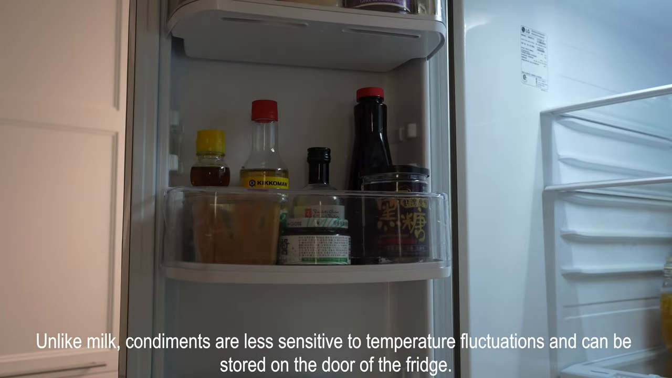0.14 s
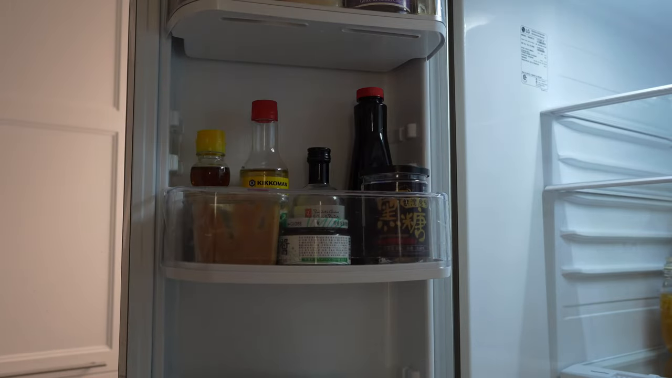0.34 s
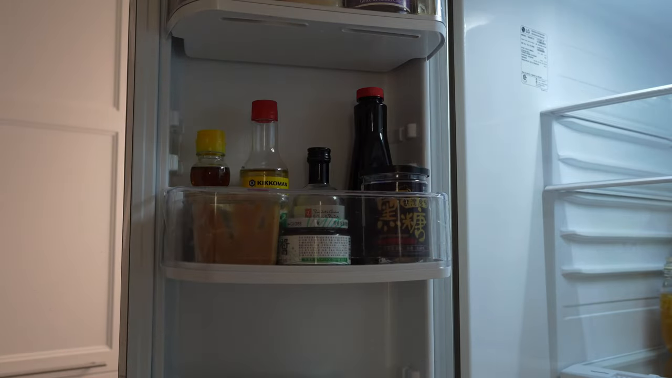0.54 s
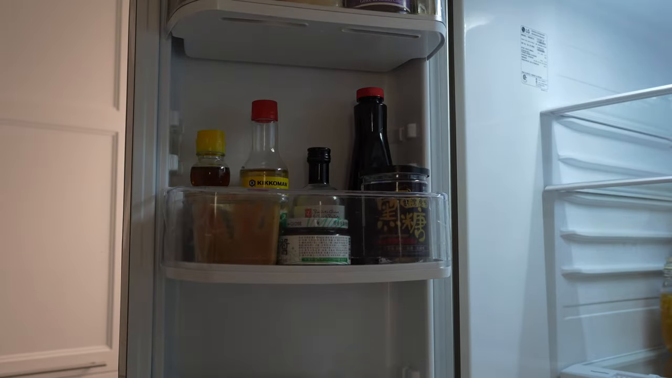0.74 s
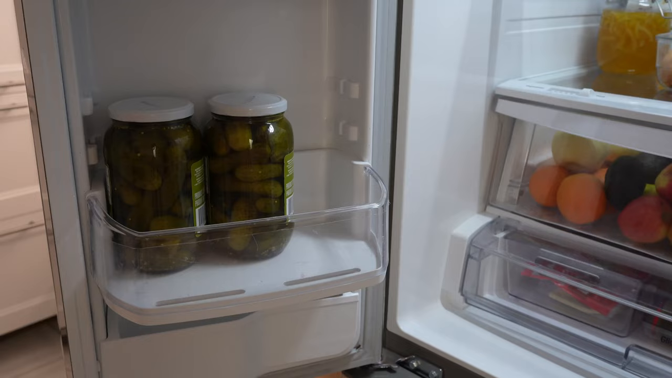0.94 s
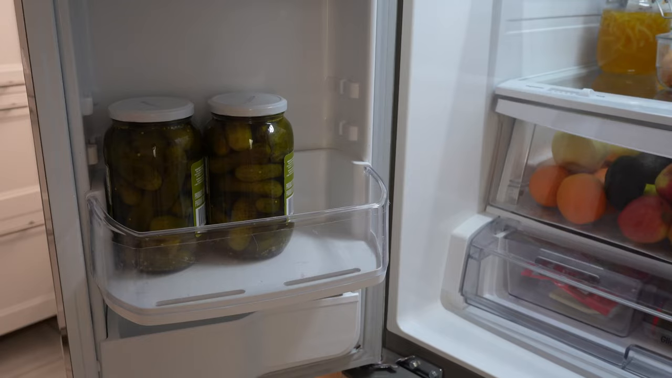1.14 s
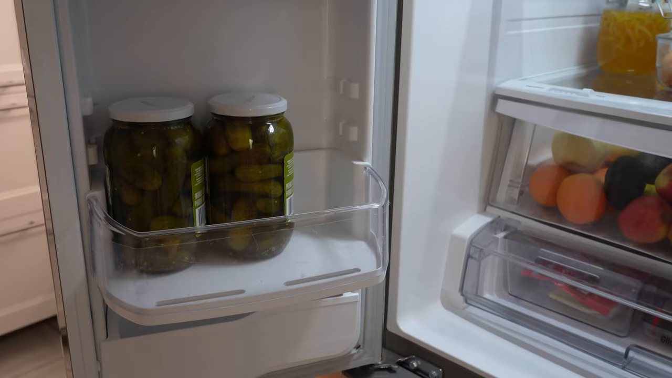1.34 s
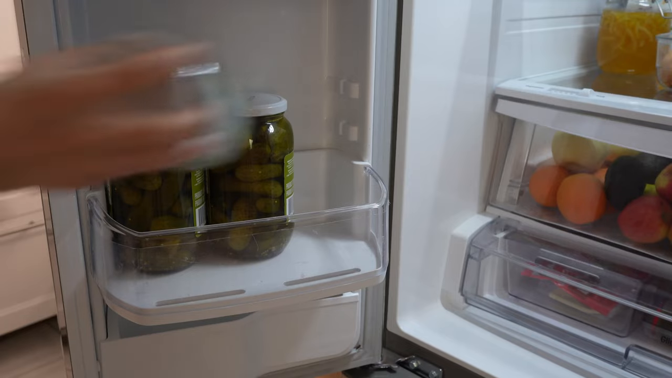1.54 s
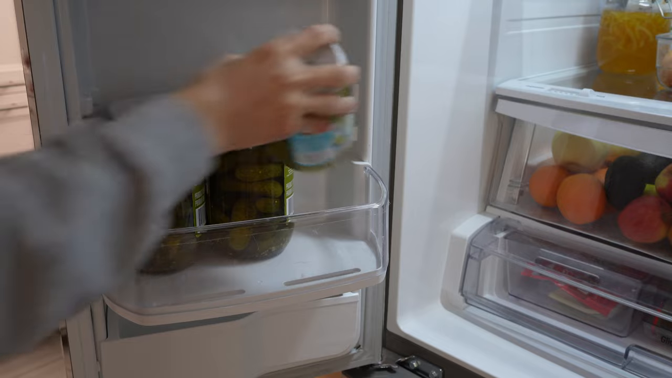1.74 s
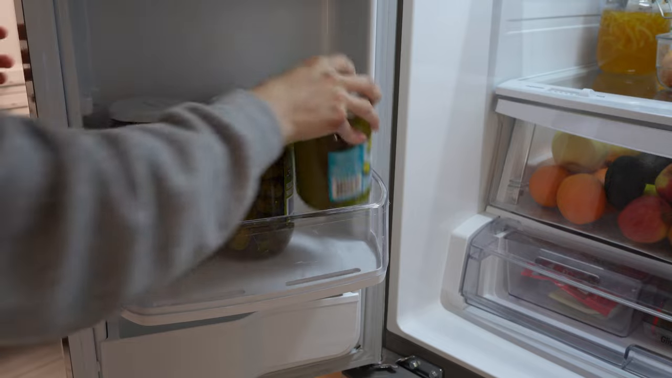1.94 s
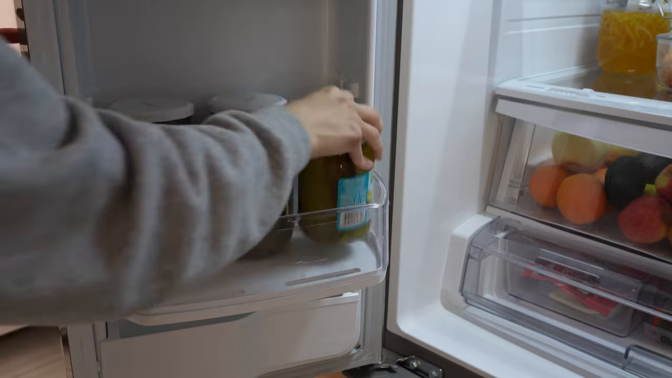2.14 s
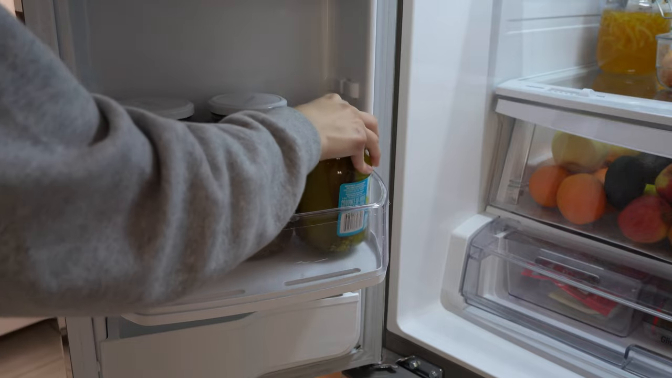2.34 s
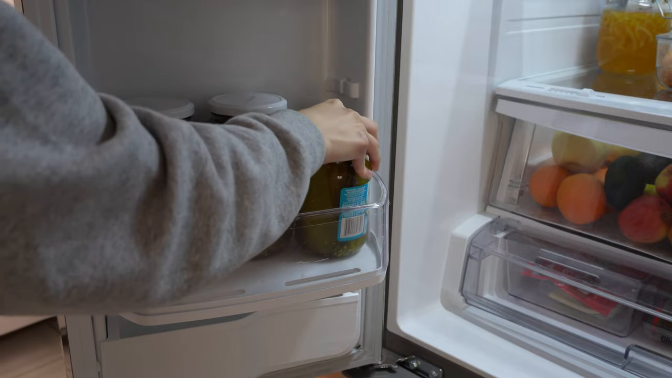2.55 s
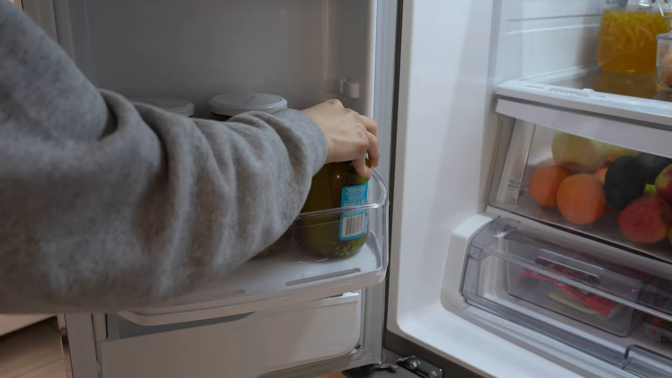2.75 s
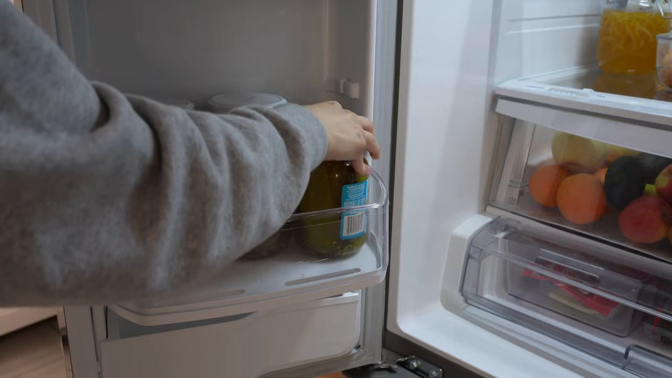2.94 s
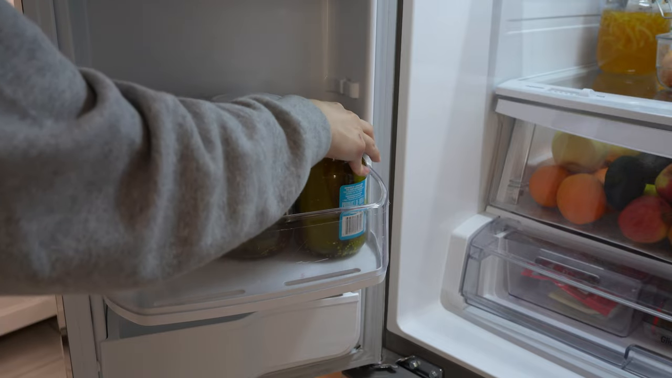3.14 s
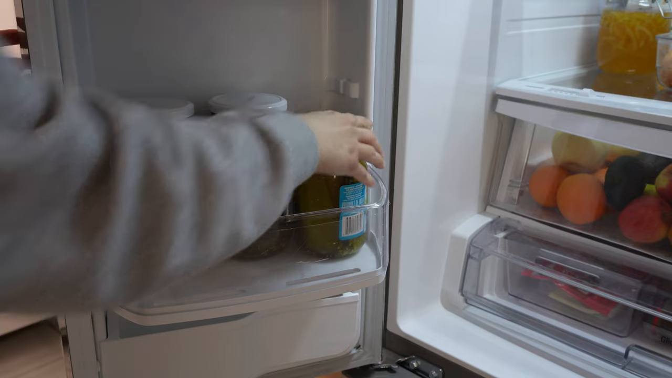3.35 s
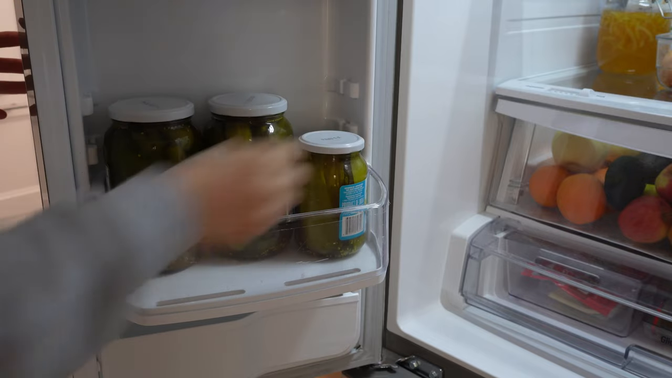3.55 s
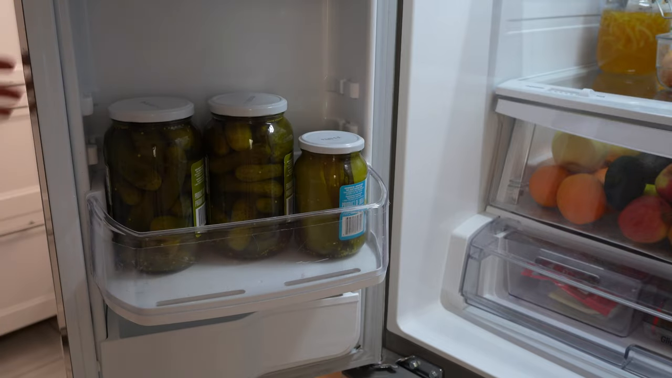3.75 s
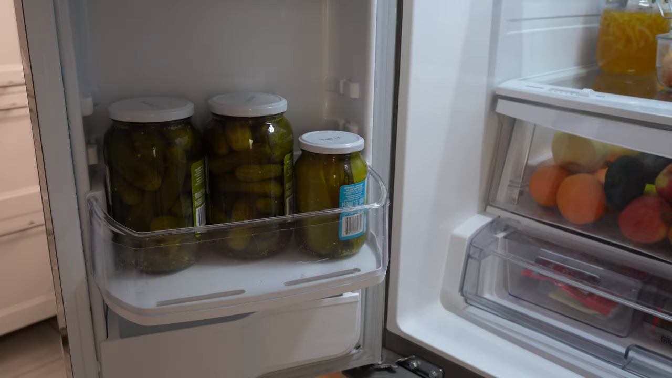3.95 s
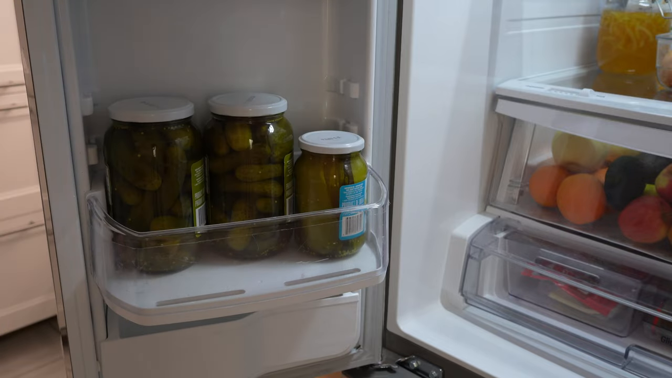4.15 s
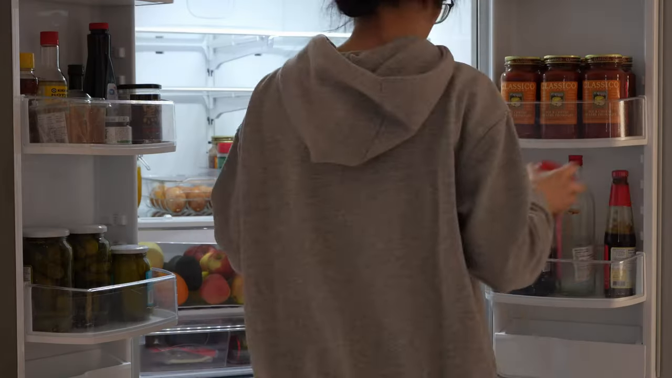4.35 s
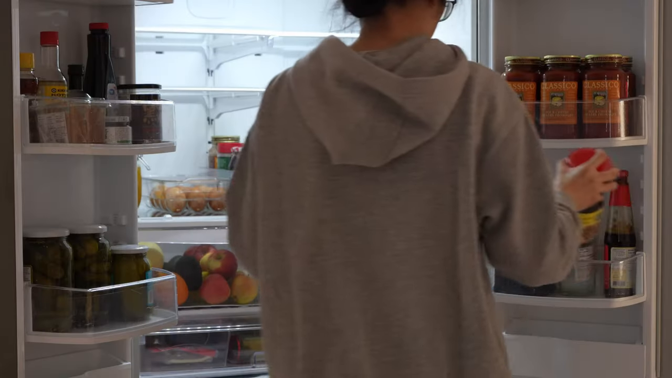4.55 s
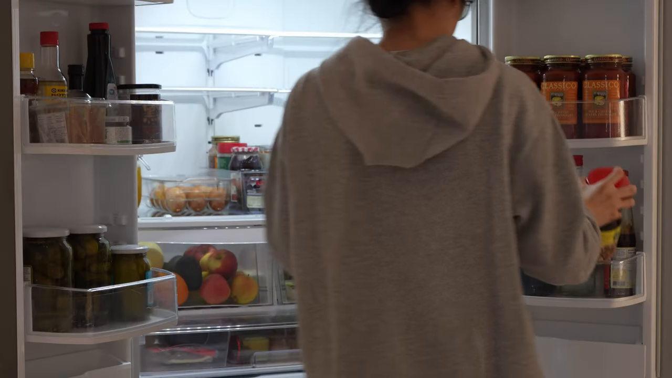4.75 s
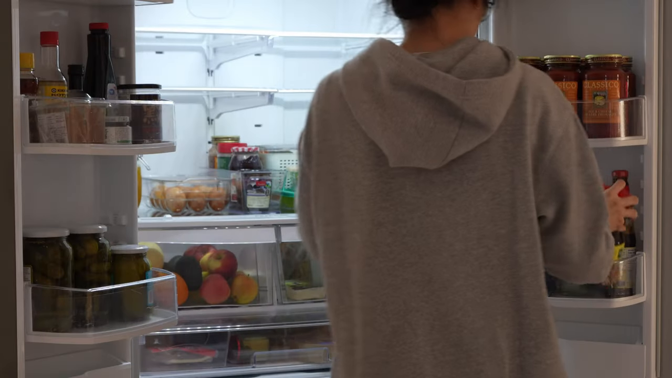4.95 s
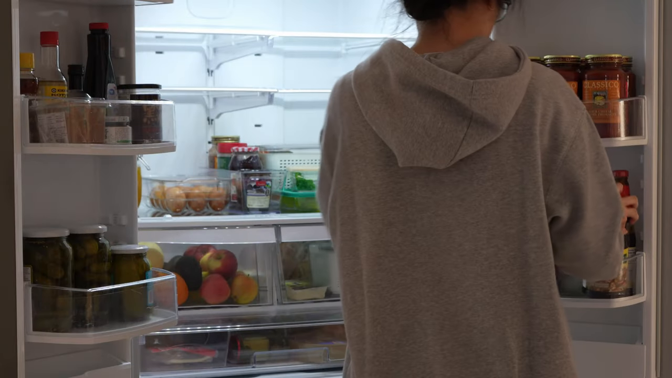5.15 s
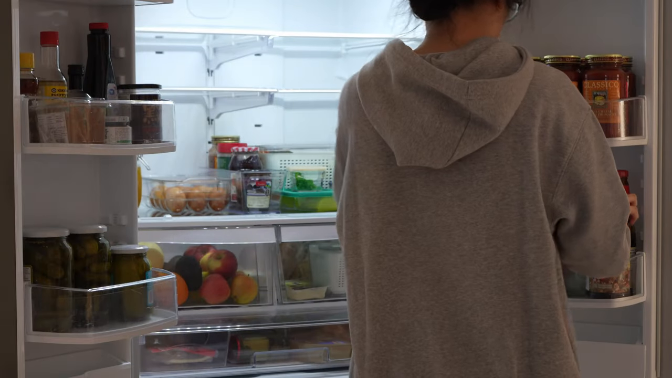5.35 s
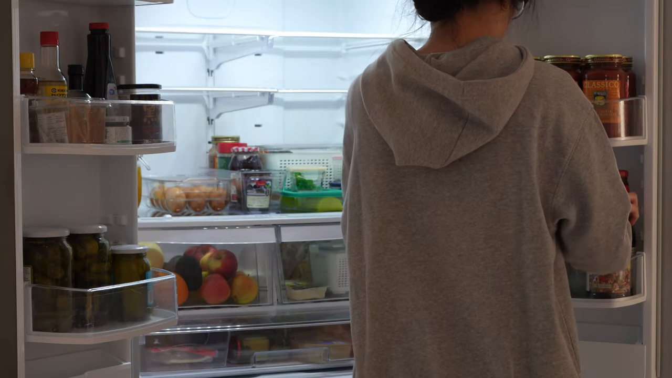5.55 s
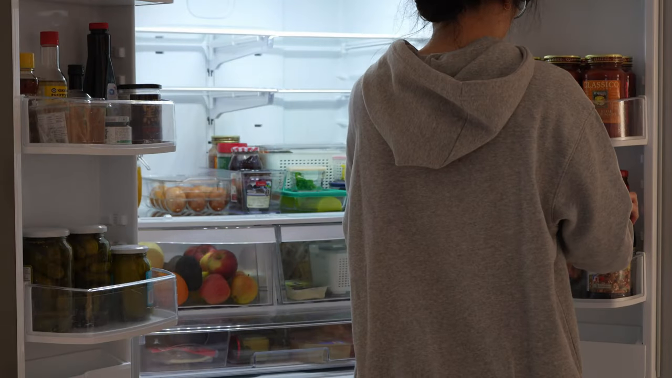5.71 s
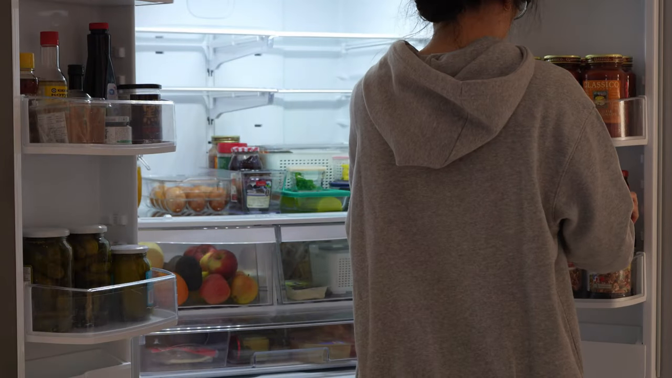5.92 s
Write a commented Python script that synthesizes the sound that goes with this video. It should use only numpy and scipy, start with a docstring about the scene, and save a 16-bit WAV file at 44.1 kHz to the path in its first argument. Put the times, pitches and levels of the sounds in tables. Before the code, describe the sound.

Quiet kitchen, open refrigerator humming, small birds whistling faintly to the right. A jar lands with a cluster of hollow plastic knocks and a brief glass clink, is nudged twice more, then released. After a pause, a bottle settles in the opposite door with roomier knocks and longer clinks.

```python
"""Jar and bottle in the fridge door

A glass jar is nudged into a plastic door bin, then a bottle goes into the other door, farther away.
Each knock is a set of dying tones, plastic clatter, a glass clink and a low boom, with a kitchen echo.
Shaped noise makes the fridge's low hum and air, the light taps and the rustling sleeve.
Gliding, slightly unsteady tones make the faint birds outside.
"""
import sys
import numpy as np
from scipy import signal
from scipy.fft import rfft, irfft
from scipy.io import wavfile
from scipy.ndimage import uniform_filter1d, minimum_filter1d

SR = 44100
rng = np.random.default_rng(int(sys.argv[2]) if len(sys.argv) > 2 else 0)


def wav_out(sig):
    """Save sig, one row per channel (or a flat mono array), as 16-bit PCM at SR to the path in sys.argv[1]."""
    wavfile.write(sys.argv[1], SR, np.round(np.clip(np.atleast_2d(sig).T, -1, 1) * 32767).astype(np.int16))


N = 263718  # length in samples, about 6 seconds


def amp(db):
    """Turns decibels into a gain."""
    return 10 ** (np.asarray(db) / 20)


def unit(x):
    """Scales a sound to an average strength (rms) of 1."""
    return x / np.sqrt(np.mean(x ** 2) + 1e-20)


def read(points, hz, axis=1):
    """Reads one column of a table at any pitch, joining its points on a log-frequency axis."""
    table = np.transpose(points)
    return np.interp(np.log(hz + 1), np.log(table[0] + 1), table[axis])


def add(mix, s, sound):
    """Adds a sound into the mix, starting at s seconds."""
    part = mix[..., max(round(s * SR), 0):][..., :sound.shape[-1]]
    part += sound[..., :part.shape[-1]]


def noise(gain, size=N):
    """Makes noise of rms 1 whose spectrum follows gain(Hz)."""
    spectrum = rfft(rng.standard_normal(size))
    return unit(irfft(spectrum * gain(np.fft.rfftfreq(size, 1 / SR)), size))


def filtered(x, hz, kind, order=2):
    """Keeps the sound below ("low") or above ("high") a frequency, with a Butterworth filter."""
    sos = signal.butter(order, np.clip(hz, 10, .49 * SR), kind, fs=SR, output="sos")
    return signal.sosfilt(sos, x)


def fading(t, t60):
    """A decay that falls by 60 dB in t60 seconds."""
    return np.exp(-np.log(1000) * t / t60)


def dying_noise(table, count=14):
    """Noise split into overlapping bands, each with its own level and decay; starts near rms 1."""
    t, hz = np.arange(SR) / SR, np.fft.rfftfreq(SR, 1 / SR)
    spectrum = rfft(noise(lambda f: amp(read(table, f)), SR))
    centres = np.geomspace(50, 16000, count)
    out = np.zeros(SR)
    for centre, band in zip(centres, np.eye(count)):
        # the band is full at its own centre and gone at its neighbours' centres
        band_noise = irfft(spectrum * np.interp(hz, centres, band), SR)
        out += band_noise * fading(t, read(table, centre, axis=2))
    return out


def fridge(hum_hz=88, hum_width_hz=20, hum_db=-2, air_level_db=-45.5, drift_db=0.8):
    """A lumpy low hum under nearly steady air noise whose treble differs between the ears."""
    # Colour of the air noise. Each row: frequency in Hz, relative level in dB per Hz.
    air_colour = [(15, -30), (25, -15), (64, 0), (86, -1.5), (173, -7), (399, -10), (457, -8), (598, -8),
                  (871, -11), (1950, -22), (3930, -28.5), (15500, -42.5)]
    # The air at the two ears. Each row: frequency in Hz, left-right correlation (1 = same in both),
    # left minus right in dB.
    likeness = [(30, 0.99, -2), (100, 0.94, 0), (400, 0.93, -1), (1440, 0.85, -3.3), (4000, 0.55, -0.5),
                (8000, 0.19, -.2), (13000, .15, 0)]
    # Slow swell of the hum, which drops to a fainter level at about 4.3 s. Each row: time in seconds, level in
    # dB before hum_db is added.
    hum_swell = np.vstack([ [(0.0, -51), (1.37, -43), (2.13, -47), (2.2, -48)], [(3.3, -46.5),
                 (4.176, -43.5), (4.336, -56), (5.1, -58)], ])
    hz = np.fft.rfftfreq(N, 1 / SR)
    same = np.clip(read(likeness, hz), -1, 1)
    lean_db = read(likeness, hz, axis=2)
    # a shared part and an opposite part together give the wanted correlation
    sources = rfft(rng.standard_normal((2, N)))
    mid, side = sources * amp(read(air_colour, hz)) * np.sqrt([1 + same, 1 - same])
    ears = np.array([mid + side, mid - side]) * amp([lean_db / 2, -lean_db / 2])
    air = unit(irfft(ears, N))
    air *= amp(drift_db * noise(lambda f: 1 / (1 + (f / 3) ** 2)))  # the level drifts slowly
    hum = noise(lambda f: 1 / (1 + ((f - hum_hz) / hum_width_hz) ** 4))
    swell_db = np.interp(np.arange(N) / SR, *np.transpose(hum_swell))
    return amp(air_level_db) * air + hum * amp(hum_db + swell_db)


def tap(hz, t60, rise=0.00083):
    """A short dying burst of noise in a band about an octave wide around hz."""
    t = np.arange(SR) / SR
    burst = noise(lambda f: (f / hz) ** 3 / (1 + (f / hz) ** 7), SR)
    return burst * fading(t, t60) * (1 - np.exp(-t / rise))


def handling(grain=0.17):
    """Light taps as noise bursts, and the sleeve as grainy noise brushing in uneven strokes."""
    # Each row: start in seconds, level in dB, centre in Hz, time to fall 60 dB in seconds.
    light_taps = [(0.401, -43.5, 2220, 0.059), (1.321, -47, 2200, 0.11), (1.436, -36.5, 760, 0.058),
                  (1.438, -55, 2980, .12), (3.961, -43.5, 3420, 0.19)]
    # Sleeve strokes. Each row: middle in seconds, length in seconds, level in dB.
    brushes = [(.27, 0.12, -61), (0.432, 0.13, -54), (0.61, 0.098, -53.5), (0.76, 0.16, -55),
               (1.43, 0.15, -56.5), (3.744, 0.36, -60), (4.04, 0.19, -58.5), (4.458, 0.28, -54)]
    # Colour of the rustle. Each row: frequency in Hz, relative level in dB per Hz.
    cloth_colour = [(300, -28), (1200, 3.5), (3000, 2), (5000, -6.5), (9000, -17.5), (15000, -36.5)]
    out, t = np.zeros(N), np.arange(N) / SR
    for s, db, hz, t60 in light_taps:
        add(out, s, amp(db) * tap(hz, t60))
    cloth = noise(lambda f: amp(read(cloth_colour, f)))
    cloth *= np.exp(grain * noise(lambda f: 1 / (1 + (f / 70) ** 2)))  # an uneven rub
    strokes = sum(amp(db) * np.exp(-(2 * (t - s) / length) ** 2) for s, length, db in brushes)
    return out + cloth * strokes


def whistle(crest_s, crest_hz, rise_s, start_hz, fall_s, end_hz, db, roundness,
            waver=0.0042, flutter_db=3.5):
    """A near-pure bird note gliding to its crest and away, swelling on the way, a little unsteady."""
    swell_lead = 0.29  # loudest this share of the rise before the crest
    rise_fade_db, fall_fade_db = -16.5, -6  # fainter at the two ends
    fall_rounder = 0.299  # the note lingers on its crest before it drops
    t = np.arange(-rise_s, fall_s, 1 / SR)
    from_crest = abs(t) / np.where(t < 0, rise_s, fall_s)
    glide = crest_hz - np.where(t < 0, start_hz, end_hz)
    pitch = crest_hz - glide * from_crest ** (roundness + fall_rounder * (t > 0))
    from_swell = np.interp(t, [-rise_s, -swell_lead * rise_s, fall_s], [-1, 0, 1])
    fade_db = np.where(from_swell < 0, rise_fade_db, fall_fade_db) * from_swell ** 2
    wobble, flutter = (noise(lambda f: 1 / (1 + (f / 150) ** 4), len(t)) for _ in range(2))
    pitch = uniform_filter1d(pitch, size=300) * (1 + waver * wobble)  # soften the corner, then waver
    strength = amp(db + fade_db + flutter_db * flutter) * signal.windows.tukey(len(t), .15)
    return crest_s - rise_s, strength * np.sin(2 * np.pi * np.cumsum(pitch) / SR)


def kitchen(x, delay=0.0082, build=0.016):
    """Diffuse echo of the room as dying noise, swelling after the first wall is reached."""
    # Each row: frequency in Hz, relative level in dB, time to fall 60 dB in seconds.
    room_decay = [(100, 1.5, 0.55), (303, -0.5, 0.56), (720, -2, 0.57), (1510, -2.5, 0.62),
                  (3200, -3.5, 0.54), (7000, -0.5, 0.46), (14000, -8, 0.17)]
    t = np.arange(SR) / SR
    tail = dying_noise(room_decay) * (1 - np.exp(-np.maximum(t - delay, 0) / build))
    mid_gain = np.sqrt(np.mean(abs(rfft(tail)[200:3000]) ** 2))  # average gain from 200 to 3000 Hz
    return signal.fftconvolve(x, tail / mid_gain)[:len(x)]


def birds(whistle_db=((-5.5,), (3.,)), chip_db=((-1.5,), (1.5,)), echo_db=-14):
    """Small birds outside, as gliding tones: whistles well to the right, the rest nearer the middle."""
    # Arched whistles. Each row: crest in seconds, crest in Hz, rise in seconds, start in Hz,
    # fall in seconds, end in Hz, level in dB before panning, roundness (under 1 pointed, 2 domed).
    whistles = [(0.365, 5860, .064, 4250, .054, 3300, -46, 0.76),
                (1.16, 6140, .072, 4400, 0.031, 4240, -50, 0.46),
                (1.47, 5100, 0.058, 4880, .012, 5050, -61, .6),
                (1.776, 5180, .056, 4230, 0.059, 2430, -51, 2.1),
                (2.02, 4910, 0.019, 4750, 0.022, 4700, -52, 1.8),
                (2.582, 5100, 0.079, 4530, 0.021, 4900, -42, 0.98)]
    # The two voices of a thin, nearly level call. Each row: the same columns as the whistles.
    thin_call = [(4.32, 6240, 0.092, 6200, .105, 6080, -59.5, 2),
                 (4.26, 5700, .012, 5760, 0.16, 5290, -57.5, 0.74)]
    # Short falling chips. Each row: crest in seconds, level in dB before panning.
    chips = [(4.072, -57), (4.148, -47), (4.803, -58), (4.866, -49.5), (4.94, -50.5)]
    # every chip is the same quick fall
    top_hz, end_hz, rise_s, fall_s, roundness = 4050, 3100, .003, .023, 0.79
    aside, ahead = np.zeros(N), np.zeros(N)
    for call in whistles:
        add(aside, *whistle(*call))
    for voice in thin_call:
        add(ahead, *whistle(*voice, waver=.002))
    for s, db in chips:
        add(ahead, *whistle(s, top_hz, rise_s, top_hz, fall_s, end_hz, db, roundness))
    echo = np.array([kitchen(aside + ahead) for _ in range(2)])  # a separate echo for each ear
    return aside * amp(whistle_db) + ahead * amp(chip_db) + amp(echo_db) * echo


def ring(modes, spot_hz, spot_db=4, spot_width=0.16, scatter_db=1.5):
    """Dying tones of a bin; the spot that is struck favours those near spot_hz."""
    t = np.arange(SR) / SR
    hz, db, t60 = np.transpose(modes)
    db = db + scatter_db * rng.standard_normal(len(modes))
    db = db + spot_db * np.exp(-((spot_hz / hz - 1) / spot_width) ** 2)
    out = np.zeros(SR)
    for k in range(len(modes)):
        tone = np.sin(2 * np.pi * hz[k] * t) * fading(t, t60[k])
        out += (-1) ** k * amp(db[k]) * tone  # every other tone starts downwards
    return out


def chime(modes, split, count=4, rise=0.00098):
    """Uneven glass: every partial is a close cluster of tones that beat against each other."""
    t = np.arange(SR) / SR
    out = np.zeros(SR)
    for hz, db, t60 in modes:
        detune, phase = rng.uniform(-0.97, 1, (2, count, 1))
        decay = fading(t, t60)
        tones = np.sin(2 * np.pi * hz * (1 + split * detune) * t + np.pi * phase)
        cluster = decay * tones.sum(0)
        # as strong as one single dying tone
        out += amp(db) * unit(cluster) * np.sqrt(np.mean(decay ** 2) / 2)
    return out * (1 - np.exp(-t / rise))


def knocks(rows, modes, clatter, glass, split, rise, thud_hz, tick_db, tick_hz, tick_t60):
    """Glass meets a plastic bin: the bin rings and clatters, the glass clinks, the room follows."""
    out, t = np.zeros(N), np.arange(SR) / SR
    for s, db, bright_hz, weight_db, spot_hz, clatter_db, glass_db, room_db in rows:
        body = ring(modes, spot_hz) + amp(clatter_db) * dying_noise(clatter)
        body *= 1 - np.exp(-t / rise)  # the base of the glass seats over a moment
        body = filtered(body, bright_hz, "low", order=1)  # a soft contact leaves out the treble
        body = filtered(body, 3 * bright_hz, "low", order=1)
        thud = amp(weight_db) * filtered(body, thud_hz, "low", order=3)  # full weight bends the whole bin
        body = thud + filtered(body, thud_hz, "high", order=3)
        tick = amp(tick_db) * tap(tick_hz, tick_t60)  # glass on glass starts with a hard tick
        clink = chime(glass, split) + tick
        hit = amp(db) * body + amp(glass_db) * clink
        add(out, s, hit + amp(room_db) * kitchen(hit))
    return out


def door_boom(rows, boom_hz=84, boom_t60=0.85, boom_db=-24, rise=0.017):
    """The heavy door takes up each knock and booms low for a moment, as a slow-rising noise burst."""
    out = np.zeros(N)
    for s, db, *_ in rows:
        add(out, s, amp(db + boom_db) * tap(boom_hz, boom_t60, rise))
    return out


def scene():
    """Knocks and handling in the middle, over the fridge and the birds."""
    # Knocks of the jar in the near bin, and of the bottle in the far bin.
    # Each row: start in seconds, level of the bin in dB, contact brightness in Hz,
    # weight of the thud in dB, tone favoured by the spot in Hz, clatter against the ringing in dB,
    # level of the glass in dB, room echo against the hit in dB.
    jar_knocks = [(2.2655, -13.5, 4600, 10.5, 220, 4, -42, -8), (2.2815, -9, 700, -28, 775, -10, -68, -9),
                  (2.358, -16, 700, -11, 780, -16, -62, -7), (2.3805, -10, 1060, 2, 810, 0, -26, -13),
                  (2.5395, -9, 3140, 0, 760, -1.5, -46, -8), (2.567, -17.5, 1420, 10, 1100, 2.5, -68, -15),
                  (2.9948, -17, 604, -23, 570, -5.5, -47, -3.5), (3.040, -44, 3000, -11, 1700, 5, -53, -2),
                  (3.0742, -22.5, 1400, 11, 437, 2, -61, -15), (3.093, -48, 450, -7, 423, -2, -68, -16),
                  (3.1085, -10.5, 417, -8, 450, -7, -68, -20), (3.3354, -40.5, 350, 14, 380, -8, -73, -16)]
    bottle_knocks = [(5.1190, -23.5, 3440, 7.5, 1230, 6.5, -48, -5),
                     (5.198, -34, 3020, 8, 1450, 4.5, -42, -1.5),
                     (5.3482, -30.5, 3300, 8.5, 1450, 8, -49, -4.5),
                     (5.4087, -8.5, 1830, 5.5, 1180, 2, -49, -6.5),
                     (5.4870, -21, 3560, -2, 1450, 4, -31, -7), (5.7733, -14, 754, 8.5, 1030, 0, -53, -5)]
    # Ringing of the loaded bins and of the glass.
    # Each row: frequency in Hz, relative level in dB, time to fall 60 dB in seconds.
    near_modes = [(137, -26, 0.35), (217.2, -9.5, 0.12), (248, -18.5, 0.22), (375.5, -5, 0.077),
                  (441.7, -6.5, 0.18), (483.6, -16, 0.31), (534, -7, 0.17), (664, -11, 0.12),
                  (713, -8, 0.097), (785.7, -3.5, 0.12), (1020, -16, 0.026), (1100, -9, 0.068),
                  (1238, -21, 0.032), (1703, -17, 0.2)]
    far_modes = [(140, -22.5, 0.3), (247, -9, 0.078), (388, -14, 0.23), (431.3, -17, 0.27),
                 (632, -15.5, 0.46), (774, -26, .25), (982, -20, 0.19), (1150, -7, 0.097),
                 (1230, -11, 0.14), (1430, -36, 0.27), (1490, -37, 0.22)]
    jar_glass = [(1690, -1, .13), (1873, -3, .13), (2887, -4, .22), (2925, 5, .07), (4474, -22, .25),
                 (4750, -22, .22), (6094, -16, .09), (8050, -20, .05)]
    bottle_glass = [(1463, 0.5, 0.44), (1920, -10, 0.39), (2940, 4, 0.11), (3110, 3, .1), (3160, 3, 0.16),
                    (3710, -4.5, 0.2), (4080, -2, 0.093), (4280, -5, .1), (4780, -13, 0.14),
                    (6080, -13.5, .15), (7009, -26, .18), (8200, -17, .08)]
    # Crowded tones of the plastic panels, heard as a short clatter.
    # Each row: frequency in Hz, relative level in dB per Hz, time to fall 60 dB in seconds.
    near_clatter = [(60, -33, 0.2), (195, -4, 0.16), (700, -3, 0.19), (1260, -1.5, 0.13), (2140, -12, 0.12),
                    (3300, -7.5, 0.062), (4500, -16, 0.039), (6570, -24.5, 0.039), (9200, -23, 0.041),
                    (15000, -29, 0.016)]
    far_clatter = [(60, -19, 0.24), (212, -8.5, 0.39), (654, 6.5, 0.16), (1370, 3.5, 0.2),
                   (2240, -10.5, 0.32), (2900, -9, 0.22), (4600, -21.5, 0.49), (6940, -27, 0.29),
                   (9900, -27, 0.22), (15000, -31, .07)]
    jar = knocks(jar_knocks, near_modes, near_clatter, jar_glass, split=0.0052,
                 rise=0.00026, thud_hz=302, tick_db=-12.0, tick_hz=5950, tick_t60=0.073)
    bottle = knocks(bottle_knocks, far_modes, far_clatter, bottle_glass, split=0.0122,
                    rise=0.0036, thud_hz=313, tick_db=-9, tick_hz=4800, tick_t60=0.11)
    boom = door_boom(jar_knocks + bottle_knocks)
    bins = filtered(jar + bottle + boom, 63, "high")  # small panels radiate no deep bass
    return bins + handling() + birds() + fridge()


def record(dry, ceiling=.86, edge_hz=15800):
    """A fast limiter holds the loudest peaks; then a filter removes what lies above edge_hz."""
    allowed = np.minimum(1, ceiling / (abs(dry).max(0) + 1e-9))
    gain = uniform_filter1d(minimum_filter1d(allowed, size=45), size=45)  # about 1 ms
    band_limit = signal.firwin(511, edge_hz, window=("kaiser", 9), fs=SR)
    return signal.oaconvolve(dry * gain, band_limit[None], "same")


dry = scene()
out = record(dry)
wav_out(out)
```